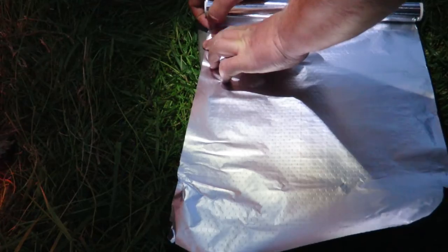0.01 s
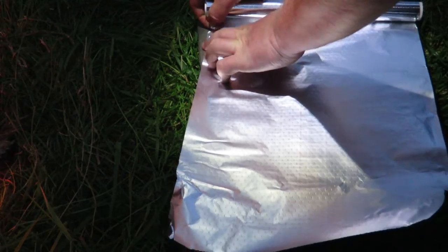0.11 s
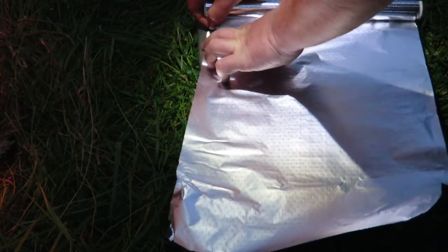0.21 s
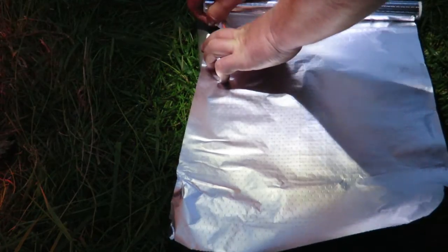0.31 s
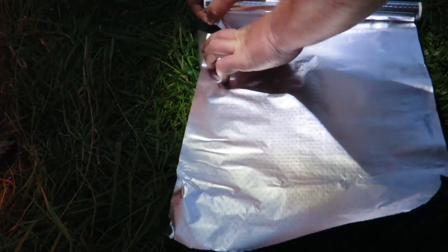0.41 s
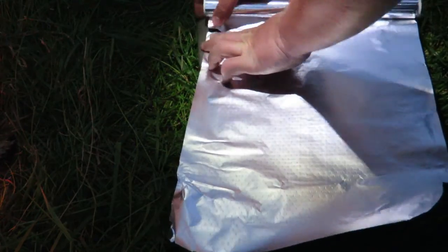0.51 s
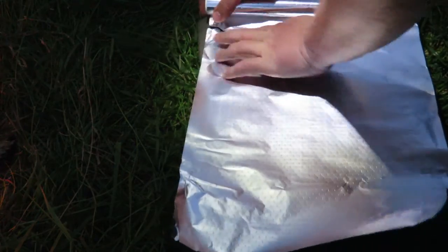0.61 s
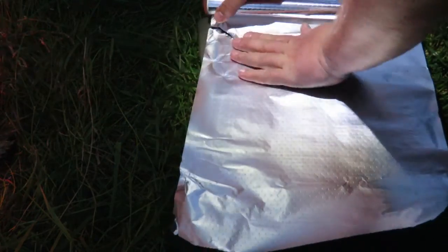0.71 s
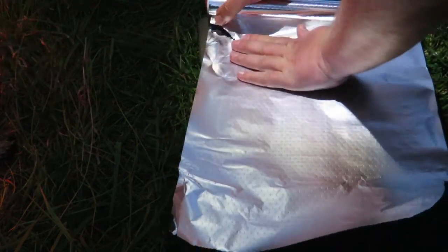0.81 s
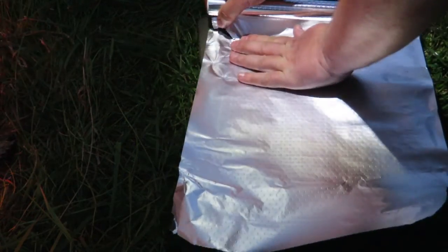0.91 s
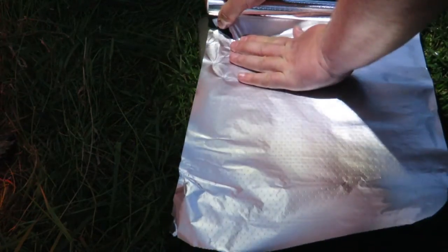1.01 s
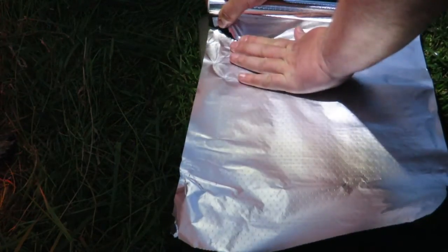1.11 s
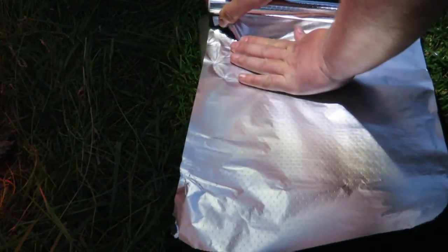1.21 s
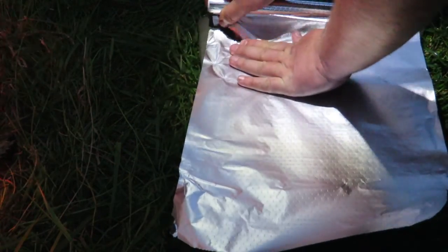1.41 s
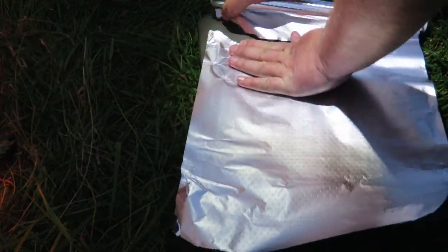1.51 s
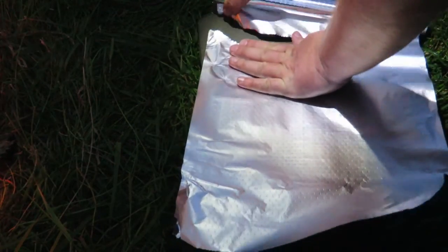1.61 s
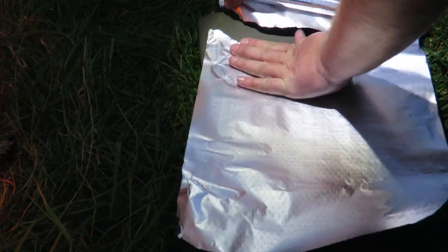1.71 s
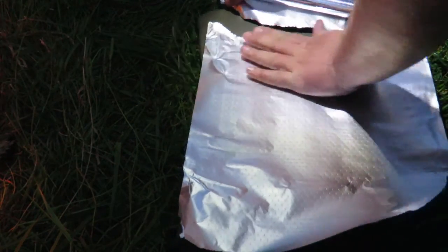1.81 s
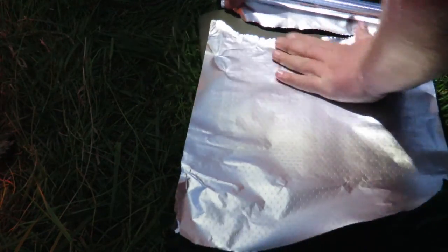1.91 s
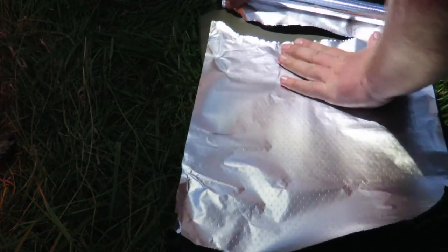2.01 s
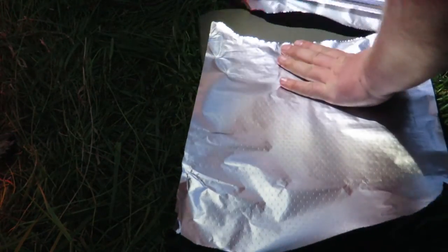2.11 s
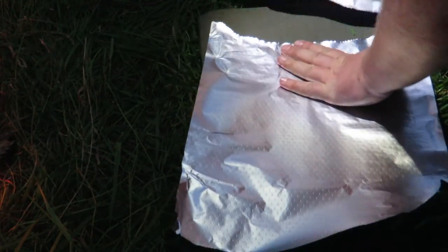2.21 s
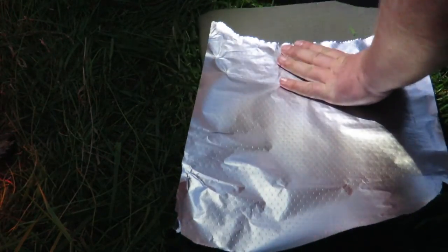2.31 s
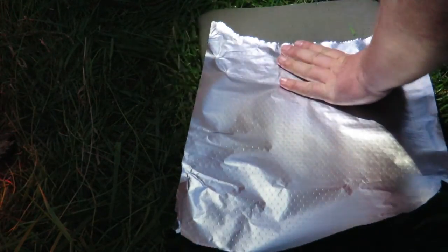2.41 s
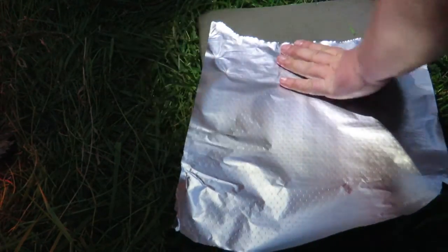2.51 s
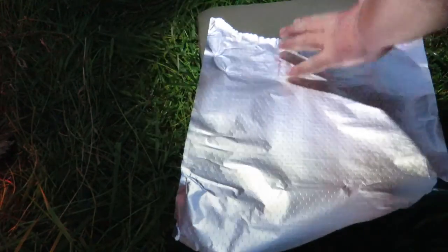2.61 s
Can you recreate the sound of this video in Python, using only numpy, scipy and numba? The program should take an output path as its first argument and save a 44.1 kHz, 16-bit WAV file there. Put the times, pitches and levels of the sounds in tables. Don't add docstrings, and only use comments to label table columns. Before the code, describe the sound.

Close, dry recording of kitchen foil being torn from a roll outdoors: quiet jerky crinkles, sharp snaps, a dense harsh rip, then sparse light ticks, with soft thuds and distant traffic hum.

```python
import sys
import numpy as np
from scipy import signal
from scipy.fft import rfft, irfft
from scipy.io import wavfile
from scipy.ndimage import uniform_filter1d
from numba import njit

SR = 44100
rng = np.random.default_rng(int(sys.argv[2]) if len(sys.argv) > 2 else 0)


def gain_from_db(level_db):
    decades = np.asarray(level_db, float) / 20
    return 10 ** decades


def wav_record(signal):
    frames = np.transpose(np.atleast_2d(signal))
    bounded = np.clip(frames, -1, 1)
    quanta = np.round(bounded * 32767).astype(np.int16)
    wavfile.write(sys.argv[1], SR, quanta)


N = 116865


def unit(x):
    return x / np.sqrt(np.mean(x ** 2))


def on_log(hz, table):
    table_hz, value = np.array(table).T
    return np.interp(np.log(hz), np.log(table_hz), value)


def band(x, hz, width_hz):
    return signal.lfilter(*signal.iirpeak(hz, hz / width_hz, fs=SR), x)


def walk(rate_hz):
    hold = int(SR / rate_hz)
    held = np.repeat(rng.standard_normal(N // hold + 1), hold)
    return unit(uniform_filter1d(held, hold // 2 + 1)[:N])


@njit
def pings(start, hz, cycles, size, rise):
    out = np.zeros(N)
    for k in range(len(start)):
        turn = np.exp((2j * np.pi - np.pi / cycles[k]) * hz[k] / SR)
        onset_decay = np.exp(-np.pi * hz[k] / (cycles[k] * rise * SR))
        z, onset = size[k] + 0j, 1.
        end = min(N, start[k] + int(2 * cycles[k] * SR / hz[k]) + 2)
        for i in range(start[k], end):
            out[i] += z.imag * (1 - onset)
            z *= turn
            onset *= onset_decay
    return out


def tearing():
    # (t/s, effort as crackle level/dB)
    tugs = [
        [(0, -39), (0.016, -30), (0.045, -50.5), (0.09, -30), (0.108, -48), (0.118, -30.5), (0.15, -36.5),
         (0.195, -30.5), (0.212, -46)],
        [(0.238, -33.5), (0.25, -24.5), (0.3, -32), (0.328, -49), (0.345, -32), (0.362, -48), (0.383, -19),
         (0.395, -38)],
        [(0.4, -20.5), (0.43, -18), (0.465, -22.5), (0.55, -33), (0.585, -27), (0.6, -33), (0.635, -29),
         (0.665, -27.5), (0.68, -35.5)],
        [(0.82, -24.5), (0.85, -30.5), (0.905, -17), (0.945, -22.5), (0.995, -34), (1.02, -23), (1.095, -39.5),
         (1.11, -62), (1.124, -37)],
        [(1.14, -26.5), (1.22, -24.5), (1.248, -18), (1.27, -27), (1.31, -20), (1.33, -37), (1.36, -27.5),
         (1.4, -41)],
        [(1.42, -22.5), (1.44, -27), (1.455, -33), (1.475, -26), (1.5, -37.5), (1.545, -38)],
    ]
    # (t/s, effort as crackle level/dB)
    rips = [
        [(1.552, -15), (1.612, -14.5), (1.635, -23), (1.7, -19.5), (1.76, -21.5)],
        [(1.775, -16.5), (1.825, -17), (1.845, -22.5), (1.895, -23.5), (1.912, -17), (1.95, -27.5),
         (2.02, -25.5)],
        [(2.06, -19), (2.082, -19.5), (2.1, -16), (2.12, -30), (2.15, -22), (2.185, -25)],
        [(2.198, -16), (2.213, -24), (2.23, -15.5), (2.243, -25), (2.256, -19), (2.29, -30.5)],
        [(2.33, -23), (2.365, -21), (2.392, -29.5), (2.41, -40.5), (2.47, -48.5)],
        [(2.55, -46.5), (2.6, -39.5), (2.65, -37.5)],
    ]
    # (t/s, share of large folds/dB)
    slack = [(0, -1), (.38, -3.5), (.5, -12), (.75, -10), (1.0, -6), (1.5, -4.5), (1.6, -9.5), (2.0, -12.5),
             (2.25, -5), (2.65, -4.5)]
    # (t/s, extra top treble/dB)
    taut = [(0, -2.5), (1.3, -2), (1.56, -5), (1.65, -1.5), (2.2, 3), (2.33, 2.5), (2.65, 7.5)]
    # (f/Hz, density/dB per Hz)
    crease = [(700, -18.5), (1500, -6), (2500, -9), (4000, -2), (6300, -2.5), (10000, -7), (13000, -5),
              (16000, -35)]
    # (f/Hz, density/dB per Hz)
    fold = [(120, 4), (250, -18), (500, 3.5), (800, 8), (1100, -3), (1500, 8.5), (2500, -11), (4000, 5.5)]
    t = np.arange(N) / SR
    effort_db = np.interp(t, *np.vstack(tugs + rips).T)
    slack_db = np.interp(t, *np.array(slack).T)
    taut_db = np.interp(t, *np.array(taut).T)
    effort_db = 10 * np.log10(gain_from_db(2 * effort_db) * slips() ** 2 + bursts())

    fine_gain = gain_from_db(effort_db - 1.5 + 1.2 * walk(70))
    deep_gain = gain_from_db(effort_db + slack_db + 1.13 * walk(60))
    fine = crackle(crease, 30000, 3.5, 2.0, fine_gain)
    brighten_db = 0.2 * (effort_db + 25.5)
    fine = fine + (gain_from_db(brighten_db) - 1) * band(fine, 12300.0, 14400.0)
    fine = fine + (gain_from_db(taut_db) - 1) * band(fine, 12300.0, 6700.0)
    return fine + crackle(fold, 4000, 2.6, 2.2, deep_gain)


def slips():
    slips_per_s, fade_s, share = 170, .004, .25
    jerks = (rng.random(N) < slips_per_s / SR) * rng.exponential(1, N)
    jerks = unit(signal.lfilter([1], [1, -np.exp(-1 / (fade_s * SR))], jerks))
    return unit(1 - share + share * jerks)


def bursts():
    # (t/s, crackle level/dB, fade/s)
    runs = [(0.143, -28, .005), (0.259, -21, 0.0027), (.263, -20, 0.0036), (.301, -26, .004),
            (.314, -19.5, 0.005), (.337, -18.5, .004), (0.3497, -14, 0.0035), (0.353, -27, 0.0018),
            (0.3694, -21, 0.0036), (.423, -19, 0.0058), (0.434, -16, .003), (0.592, -30, .004),
            (0.606, -19, 0.008), (0.642, -20, .003), (.695, -25, 0.012), (0.774, -23, 0.01),
            (0.894, -22, .004), (0.949, -15, .004), (0.953, -12, .003), (.968, -16.5, 0.0039),
            (0.986, -24, 0.0024), (1.0, -20, .004), (1.0166, -17, 0.0065), (1.073, -25, .005),
            (1.088, -17.5, 0.0048), (1.136, -22, .006), (1.163, -30, .004), (1.18, -20, 0.0047),
            (1.2113, -16.5, 0.005), (1.376, -21, 0.0054), (1.412, -23, .006), (1.439, -21, .004),
            (1.9045, -27, 0.0034), (2, -32, .004), (2.03, -21, .004), (2.09, -24, .005),
            (2.217, -10, 0.0028), (2.221, -16.5, 0.0056), (2.246, -16, .004), (2.304, -18.5, 0.0047),
            (2.325, -18, .005), (2.343, -20, .003), (2.361, -24, 0.0027), (2.371, -20, 0.0047),
            (2.4835, -33, 0.0072), (2.518, -34, 0.017), (2.559, -24, 0.0091), (2.591, -33, 0.0056),
            (2.615, -30.5, 0.013), (2.635, -35, 0.0054)]
    rise_s = .0006
    s, db, fade_s = np.array(runs).T[:, :, None]
    age_s = np.maximum(np.arange(N) / SR - s, 0)
    return np.sum(gain_from_db(2 * db) * (1 - np.exp(-age_s / rise_s)) * np.exp(-2 * age_s / fade_s), axis=0)


def crackle(colour, grains_per_s, cycles, spread_db, envelope):
    largest_share = .006
    when, pitch, rank, q, sign = rng.random((int(grains_per_s * N / SR), 5)).T
    low_hz, high_hz = colour[0][0], colour[-1][0]
    hz = low_hz * (high_hz / low_hz) ** pitch
    start = (when * N).astype(np.int64)
    cycles = cycles * (0.68 + 1.03 * q)
    size_db = -spread_db * np.log(np.maximum(rank, largest_share)) + on_log(hz, colour)
    size = gain_from_db(size_db) * hz / np.sqrt(cycles)
    power = np.sum(size ** 2 * cycles * SR / hz / (8 * np.pi)) / N
    size = np.sign(sign - .5) * size * envelope[start] / np.sqrt(power)
    return pings(start, hz, cycles, size, 0.43)


def snaps():
    # (t/s, panel ring/dB, ring f/Hz, bright crack/dB)
    fold_snaps = [(0.0105, -16.5, 1190, -26), (0.0634, -28, 3380.0, -45), (0.1144, -20.5, 1830, -15),
                  (0.1426, -20, 4050, -33), (0.1468, -17, 2770, -16.5), (0.2227, -23, 1600.0, -21),
                  (0.2435, -8.5, 3220, -4), (0.2437, -10, 1300, -31), (0.2573, -16.0, 5320.0, -30),
                  (0.2636, -12, 2960, -9.5), (0.2717, -13.5, 4920.0, -7), (0.2865, -16, 1540, -37),
                  (0.3142, -20.5, 704, -31), (0.3368, -31, 4200, -33), (0.3504, -17.5, 5000, -19),
                  (0.3715, -15, 4750, -32), (0.3992, -5, 4950, -15), (0.4028, -2.5, 5130, -19),
                  (0.4051, -5.5, 1530, -19), (0.4595, -31, 3150, -1), (0.5915, -26, 4700.0, -26),
                  (0.6082, -10.5, 3630, -30), (0.6563, -12, 3700, -27), (0.6611, -12, 3970, -20),
                  (0.6628, -11.5, 3950, -20), (0.7212, -9, 3100, -4.5), (0.7502, -22, 3370, -9),
                  (0.8699, -16, 5500, -24), (0.9485, -5.5, 2800, -24), (0.9792, -8, 1950, -28),
                  (1.0345, -11, 1600, -26), (1.0761, -16, 1640, -33), (0.6205, -25, 1990, -28),
                  (1.1, -12, 2020, -11), (1.126, -9.5, 1950, -16), (1.133, -6.5, 1700, -29),
                  (1.2329, -11.5, 3200, -26), (1.2416, -5.5, 3240, -24), (1.278, -10, 3700, -7),
                  (1.34, -11.5, 3470, -14), (1.3477, -4.5, 1720, -9), (1.348, -13, 700, -19),
                  (1.415, -17, 1430, -17), (1.47, -13, 4900, -23), (1.514, -17, 624, -45),
                  (1.529, -22, 3100, -38), (1.554, 0, 2930, -25), (1.563, -1, 3300, -20),
                  (1.583, -10, 1610, -27), (1.614, -9, 3450, -25), (1.6877, -19, 4400, -15),
                  (1.9112, -21, 6400, -8), (2.146, -21, 1430, -6.5), (2.1903, -23, 5730, -10),
                  (2.2318, -5, 5980, -9), (2.2785, -19, 3040, -22), (2.307, -19, 4900, -28),
                  (2.388, -36, 3060, -22), (2.485, -32, 3020, -38), (2.5194, -35, 1800, -34),
                  (2.535, -31, 6400, -25), (2.5579, -21, 1850, -16), (2.5917, -31, 3320, -21),
                  (2.6144, -37, 1590, -32)]
    ring_s, crack_rise_s, crack_s = .0027, .00015, .0008
    s, ring_db, hz, crack_db = np.array(fold_snaps).T
    start, t = (s * SR).astype(np.int64), np.arange(600) / SR
    rings = pings(start, hz, ring_s * hz, 2 * gain_from_db(ring_db - 4.5), 0.13)

    noise = rng.standard_normal((len(s), 2, len(t)))
    noise = noise * (1 - np.exp(-t / crack_rise_s)) * np.exp(-t / crack_s)
    noise = 3.72 * noise / np.linalg.norm(noise, axis=2, keepdims=True)
    bright = band(noise[:, 0], 9400.0, 10600.0) * gain_from_db(crack_db - 2)[:, None]
    body = band(noise[:, 1], 2660.0, 4500.0) * gain_from_db(ring_db + 4.5)[:, None]
    cracks = np.zeros(N)
    np.add.at(cracks, np.minimum(start[:, None] + np.arange(len(t)), N - 1), bright + body)
    return cracks, rings


def shimmer(x):
    # (f/Hz, T60/s)
    sheet_t60 = [(300, 0.12), (1200, 0.085), (4000, 0.17), (8000, 0.076), (13000, 0.03)]
    shapes, hold_samples = 16, 200
    t = np.arange(SR // 3) / SR
    tails = np.zeros((shapes, len(t)))
    for hz in 150 * 2 ** np.arange(0, 6.8, .5):
        noise = unit(band(rng.standard_normal((shapes, len(t))), hz, hz / 2))
        tails += noise * np.sqrt(hz) * gain_from_db(-60 * t / on_log(hz, sheet_t60))
    tails = tails * np.minimum(t / 0.00071, 1)
    active = np.arange(N) // hold_samples % shapes == np.arange(shapes)[:, None]
    ring = signal.fftconvolve(x * active, unit(tails) / np.sqrt(len(t)), axes=1)[:, :N].sum(axis=0)
    return x + gain_from_db(-9) * ring


def thuds():
    # (t/s, level/dB, f/Hz)
    landings = [(0.046, -34, 120), (.2, -33, 75), (0.384, -26, 190), (.47, -33, 152), (0.941, -40, 280),
                (1.069, -27, 328), (1.148, -31, 110), (1.509, -32, 120), (1.562, -24.5, 212),
                (1.58, -24.5, 212), (2.086, -40, 387), (2.225, -23, 403), (2.545, -35, 95),
                (2.599, -41, 151), (2.63, -31.5, 91)]
    s, db, hz = np.array(landings).T
    return pings((s * SR).astype(np.int64), hz, np.full(len(s), 2.8), 2 * gain_from_db(db), 0.31)


def hum():
    # (f/Hz, density/dB per Hz)
    hum_colour = [(15, -42), (25, 5.5), (96, 5.5), (182, 1), (306, -9), (400, -8), (520, -2), (880, -120)]
    hz = np.maximum(np.arange(N // 2 + 1) * SR / N, 1)
    low = unit(irfft(rfft(rng.standard_normal(N)) * gain_from_db(on_log(hz, hum_colour)), N))
    low = low * gain_from_db(-47 + 2.4 * walk(6.99))
    hiss = unit(band(rng.standard_normal(N), 980.0, 1800.0))
    return low + gain_from_db(-51) * hiss


def scene():
    ring_wet = .4
    foil = tearing()
    cracks, rings = snaps()
    mid = shimmer(foil + cracks + ring_wet * rings) + (1 - ring_wet) * rings + thuds() + hum()
    late = np.roll(mid, 300)
    side = gain_from_db(-26) * band(late, 300, 160.0) + gain_from_db(-33) * late
    return np.array([mid + side, mid - side])


def low_pass(x):
    return signal.sosfilt(signal.butter(12, 17000, fs=SR, output="sos"), x)


def record(dry):
    peak_hz, width_hz, peak_db = 8210, 1820, 1
    low_cut_hz, top_hz = 75, 15750
    corners_hz = [peak_hz - width_hz / 2, peak_hz + width_hz / 2]
    peak = signal.lfilter(*signal.bessel(2, corners_hz, "band", fs=SR, norm="mag"), dry)
    x = dry + gain_from_db(peak_db) * peak
    x = signal.sosfilt(signal.butter(2, low_cut_hz, "high", fs=SR, output="sos"), x)
    x = np.tanh(1.25 * x) / 1.25
    x = signal.sosfilt(signal.ellip(8, .3, 45, top_hz, fs=SR, output="sos"), x)
    return low_pass(x)


dry = scene()
out = record(dry)
wav_record(out)
```